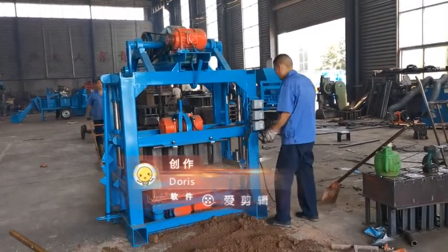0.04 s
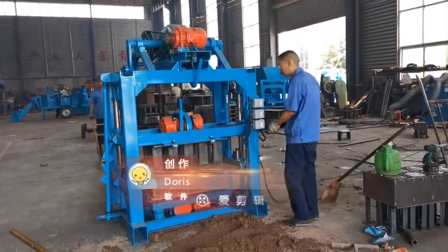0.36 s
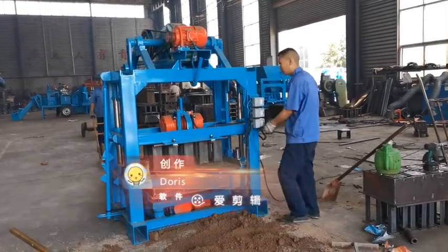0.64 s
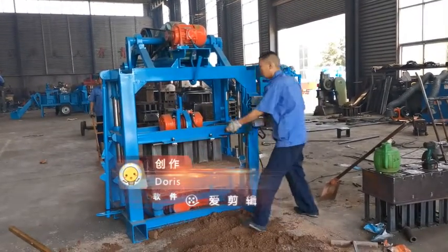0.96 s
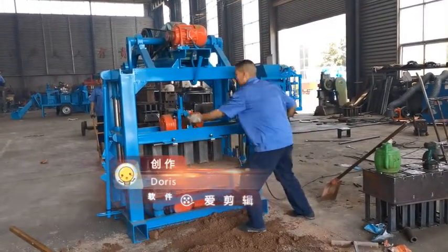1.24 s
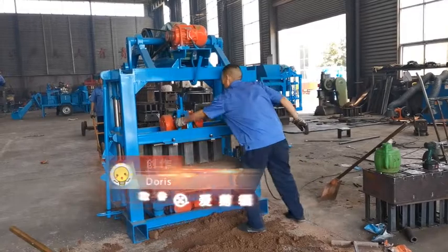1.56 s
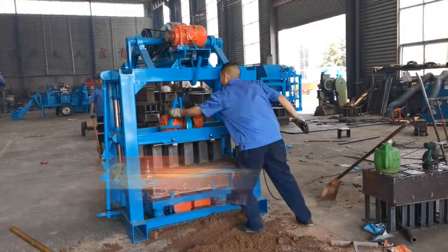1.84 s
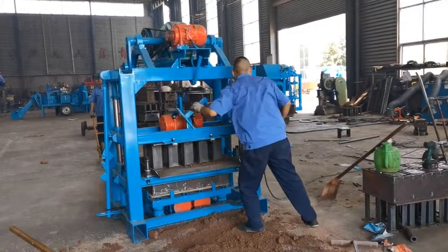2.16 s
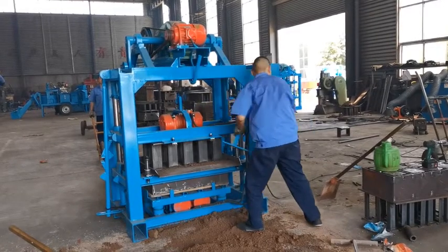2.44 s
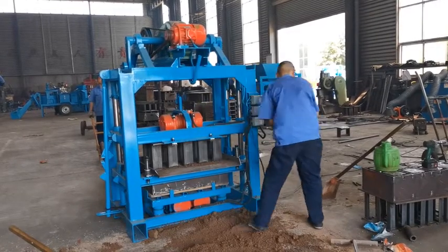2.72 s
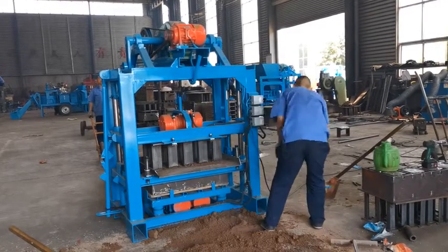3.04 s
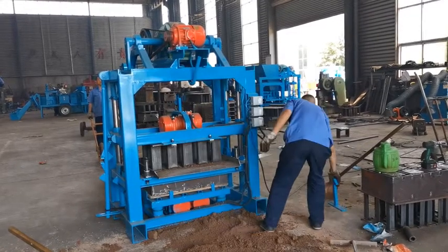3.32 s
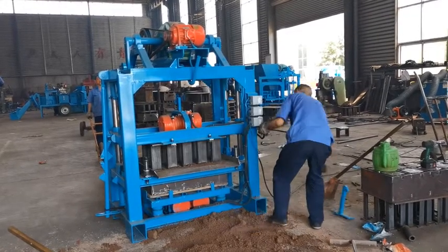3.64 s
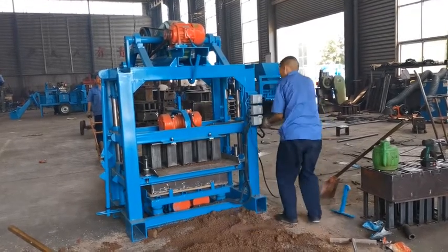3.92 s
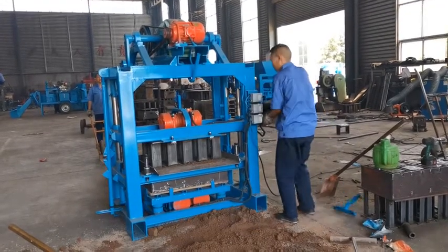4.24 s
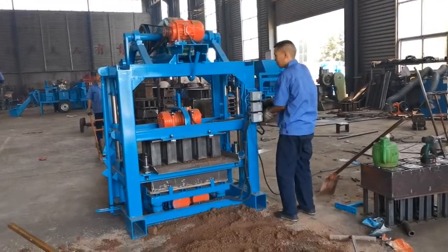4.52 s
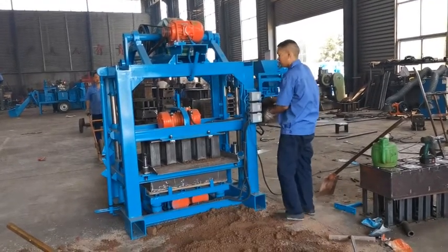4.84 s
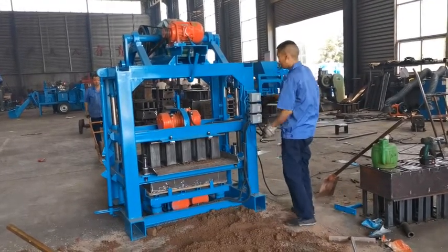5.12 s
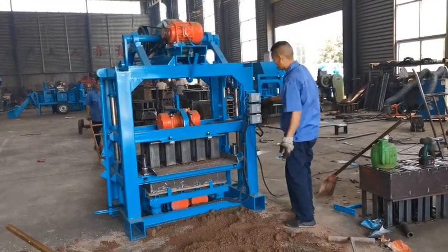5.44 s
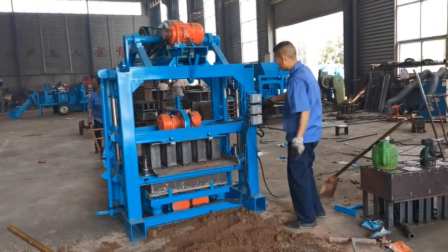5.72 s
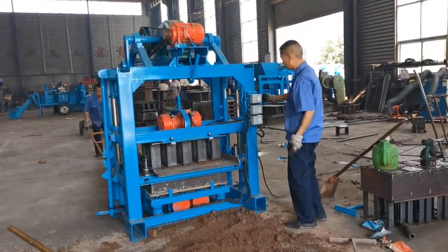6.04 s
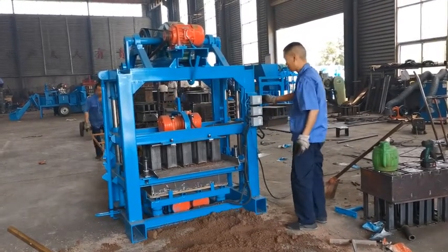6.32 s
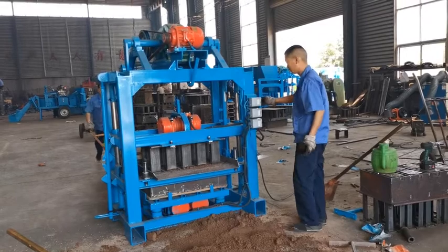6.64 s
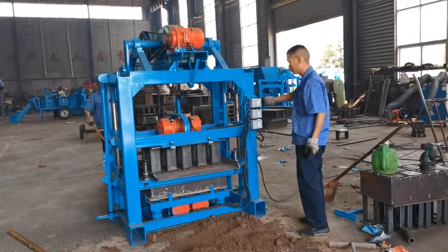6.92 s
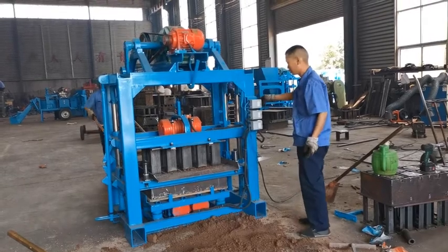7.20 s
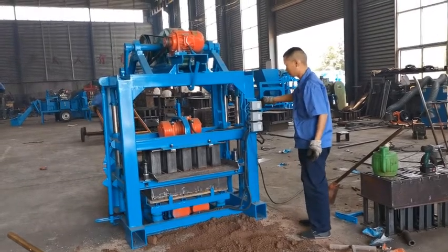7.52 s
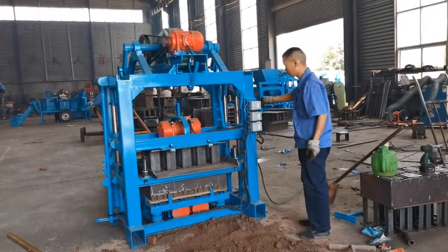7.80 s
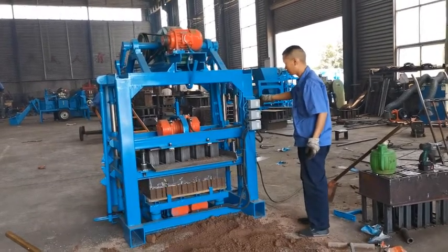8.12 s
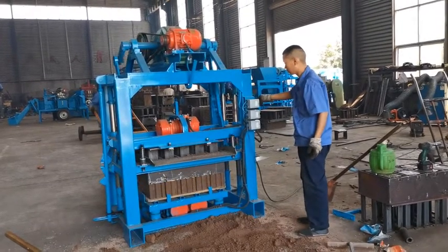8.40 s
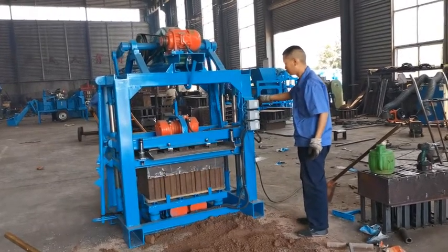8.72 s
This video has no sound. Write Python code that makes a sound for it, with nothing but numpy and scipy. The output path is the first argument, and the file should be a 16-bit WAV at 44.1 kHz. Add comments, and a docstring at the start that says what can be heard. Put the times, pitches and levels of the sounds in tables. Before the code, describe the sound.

A concrete block machine vibrates loudly in an echoing workshop, its motors droning in slow pulses while loose steel buzzes, rattles and clangs. About halfway through, the motors switch off and coast down with dull bumps and fading clatter. A much quieter rumble and hum follow as the mould lifts, with scattered metallic knocks, a click and a brief high squeal of sliding steel over a faint steady hiss.

```python
"""Concrete block machine in a steel shed

Two unbalanced motors force a mould into vibration. They drift in and out of step, so their harmonics
beat, while loose steel is struck once a turn. Switched off, they coast down and the mould bumps on its
table. Then it is hoisted: a low rumble and hum, knocks that ring the frame, and the stick-slip squeal
of sliding steel. The shed adds reverberation and a steady hiss."""
import sys
import numpy as np
from scipy import signal
from scipy.fft import rfft, irfft, next_fast_len
from scipy.io import wavfile
from scipy.ndimage import uniform_filter1d, minimum_filter1d, map_coordinates

SR = 44100
rng = np.random.default_rng(int(sys.argv[2]) if len(sys.argv) > 2 else 0)


def digitize_waveform(pressure):
    """Quantize a signal to 16-bit integers and store it at the path in sys.argv[1].

    Rows of a 2-D input are taken as channels; values are limited to [-1, 1].
    """
    field = np.atleast_2d(pressure).T
    bounded = np.clip(field, -1, 1)
    quanta = np.round(bounded * 32767).astype(np.int16)
    wavfile.write(sys.argv[1], SR, quanta)


N = 390726
TIME = np.arange(N) / SR
SWITCH_OFF_S, LAST_BEAT_END_S = 4.3, 4.5


def amp(db):
    """Decibels to amplitude ratio."""
    return 10 ** (np.asarray(db) / 20)


def unit(x):
    """Normalisation to rms 1."""
    return x / np.sqrt(np.mean(x ** 2) + 1e-20)


def along(points, hz):
    """Interpolation on a logarithmic frequency axis."""
    f, values = np.transpose(points)
    return np.interp(np.log(hz + 1), np.log(f + 1), values)


def curves(rows):
    """Linear interpolation in time of each column after the first."""
    s, *columns = np.transpose(rows)
    return [np.interp(TIME, s, column) for column in columns]


def bell(x, width):
    """Gaussian pulse: 1 at x = 0, 1/e at x = width."""
    return np.exp(-(x / width) ** 2)


def fade(after, db_per_s):
    """Unit gain, then exponential decay."""
    return amp(-db_per_s * np.maximum(TIME - after, 0))


def swell(peak_s, rise_s, db_per_s):
    """Gaussian rise to 1, then exponential decay."""
    return bell(np.minimum(TIME - peak_s, 0), rise_s) * fade(peak_s, db_per_s)


def struck(s, db, t60, attack):
    """Impact envelope: fast rise, exponential decay."""
    t = np.maximum(TIME - s, 0)
    return amp(db - 60 * np.minimum(t / t60, 3)) * (1 - np.exp(-t / attack))


def wobble(rate):
    """Smooth random modulation, rate knots a second."""
    knots = rng.standard_normal(int(N * rate / SR) + 4)
    return np.interp(TIME, TIME[::32], map_coordinates(knots, [TIME[::32] * rate]))


def noise():
    """Two uncorrelated white noises."""
    return rng.standard_normal((2, N))


def filtered(x, response):
    """Linear filtering by a complex frequency response."""
    size = next_fast_len(N + SR // 4, True)
    return irfft(rfft(x, size) * response(np.fft.rfftfreq(size, 1 / SR)), size)[..., :N]


def resonances(modes):
    """Modal superposition: the response of damped resonators of alternating sign."""
    return lambda f: sum((-1) ** k * amp(db) * 1j * f * width / (hz * hz - f * f + 1j * f * width)
                         for k, (hz, width, db) in enumerate(modes))


# likeness of left and right (frequency [Hz], coherence [0-1])
COHERENCE = [(200, 0.95), (400, 0.91), (700, 0.8), (1200, 0.96), (2500, 0.33), (6000, 0.22)]
def spread(pair):
    """Partial coherence: mid-side mixing makes two signals alike in the bass."""
    def weights(hz):
        angle = np.arccos(np.clip(along(COHERENCE, hz), -1, 1)) / 2
        return np.array([np.cos(angle), np.sin(angle)])
    mid, side = filtered(pair, weights)
    return np.array([mid + side, mid - side])


def coloured(pair, spectrum):
    """Spectral shaping by (frequency [Hz], level [dB]) points, to stereo of rms 1."""
    return unit(spread(filtered(pair, lambda hz: amp(along(spectrum, hz)))))


# the shed's reverberation time (frequency [Hz], T60 [s])
SHED_T60 = [(100, 0.58), (500, 1.2), (1200, 1.34), (4000, 1.92), (12000, 0.019)]
def shed(x, wet_db):
    """Reverberation: direct sound plus a diffuse tail, each frequency decaying at its own rate."""
    hz, t, spectra = signal.stft(rng.standard_normal((2, SR)), SR, nperseg=256)
    tail = signal.istft(spectra * amp(-60 * t / along(SHED_T60, hz)[:, None]), SR, nperseg=256)[1]
    echo = signal.fftconvolve(np.atleast_2d(x), tail / np.linalg.norm(tail[0]), axes=1)[:, :N]
    return x + amp(wet_db) * echo


# beats of the two motors (start [s], thump [dB], buzz [dB], rattle [dB], head drone [dB],
# second harmonic [dB], synchrony in mid-beat [0-1])
BEAT_CYCLES = [(0, -10, 3, -4, -11, -4.5, 0.7), (0.772, 0.5, -0.5, 1.5, 2, .5, 0.8),
               (1.572, -3, 3.5, 2.5, 1, -3, 0.98), (2.367, 1, -0.5, 2.5, 2, -.5, 0.44),
               (3.05, -1.5, -2, 2.5, -16, 1.5, 0.87), (3.902, 4.5, -5, 3, 2, -1, 0.3)]
def beat_edges():
    """Beating: each cycle starts when the motors pull hardest against each other."""
    return np.array([row[0] for row in BEAT_CYCLES] + [LAST_BEAT_END_S])


def each_beat(place, width):
    """Cyclic modulation: a pulse at the same phase (0-1) of every beat."""
    edges = beat_edges()
    phase = np.interp(TIME, edges, np.arange(len(edges)))
    return bell((phase - place + .5) % 1 - .5, width)


def beat_strengths():
    """Each beat's levels and synchrony, interpolated between beat centres."""
    edges = beat_edges()
    centres = (edges[:-1] + edges[1:]) / 2
    return [np.interp(TIME, centres, column) for column in np.transpose(BEAT_CYCLES)[1:]]


# both motors coasting (time [s], speed [turns/s])
COAST_SPEED = [(4.5, 43), (4.9, 28.6), (5.4, 22), (6.4, 11.2)]
def shaft(speed):
    """Shaft angle in turns is the integral of speed, driven and then coasting."""
    coasting, = curves([(SWITCH_OFF_S, np.interp(SWITCH_OFF_S, TIME, speed))] + list(COAST_SPEED))
    return np.cumsum(np.where(TIME < SWITCH_OFF_S, speed, coasting)) / SR - .27


# the table motor's drift about its mean pace (time [s], lead [turns])
TABLE_DRIFT = [(0, -.1), (.2, -.03), (.65, -.11), (1.05, .02), (1.5, -.08), (1.83, .11), (2.2, 0),
               (2.45, -.01), (2.92, -.16), (3.3, .02), (3.7, -.03), (4, 0), (4.3, -.22)]
def motors():
    """Coupled rotors: once a beat the head motor races ahead, then drags the table motor down."""
    table_hz, sag_hz, head_hz, race_hz = 48.35, 1.8, 48.6, 2.4
    table = shaft(table_hz - sag_hz * each_beat(place=0, width=.21)) + curves(TABLE_DRIFT)[0]
    head = shaft(head_hz + race_hz * each_beat(place=.747, width=.4))
    return table, head


def harmonic(turns, order, jitter):
    """A shaft harmonic of rms 1; dispersion in the frame delays its phase, smearing each thud."""
    lag_cycles = .045 * (order - 5) ** 2
    return np.sqrt(2) * np.cos(2 * np.pi * (order * turns - lag_cycles) + jitter * wobble(30))


# table harmonics (order [1], level [dB], dip [dB], dip phase [beats], dip width [beats])
TABLE_HARMONICS = [(1, -40, 14, 0.06, 0.16), (2, -26, 21, .96, 0.18), (3, -26, 8, 0.88, 0.16),
                   (4, -26, 7, 0.83, 0.25), (5, -20, 9.5, 0.95, 0.082), (6, -17.5, 13.5, 0.69, 0.13),
                   (7, -20.5, 7.5, .66, 0.17), (8, -26.5, 17.5, 0.06, 0.22), (9, -30, 1, 0, 0.24),
                   (10, -25.5, 8, 0.47, 0.072), (12, -40.5, 8, 0, 0.23), (13, -48, 6, 0, .2),
                   (14, -42, -7.5, 0.05, 0.33)]
def table_drone(table):
    """Forced vibration: a rotating unbalance swings the frame; in step, the eighth harmonic sings."""
    *_, hum_db, in_step = beat_strengths()
    boost_db = {2: hum_db, 8: 15.5 * in_step}
    out = np.zeros(N)
    for order, db, dip_db, place, width in TABLE_HARMONICS:
        level_db = db + boost_db.get(order, 0) - dip_db * each_beat(place, width) + .68 * wobble(6.19)
        out += amp(level_db) * harmonic(table, order, jitter=.039)
    return out


# panel howls (peak time [s], half length [s], level [dB], order [1])
PANEL_HOWLS = [(0.035, 0.078, -19, 15), (0.08, 0.052, -20.5, 7), (0.1, 0.055, -27, 19),
               (.3, 0.19, -30.5, 13), (0.448, 0.096, -27.5, 19), (0.618, 0.08, -16.5, 10),
               (0.87, 0.052, -31, 14), (0.932, 0.049, -13, 10), (1.486, 0.1, -27.5, 10),
               (1.62, .16, -31, 14), (1.71, 0.041, -15.5, 10), (1.92, 0.12, -34, 17),
               (2.572, 0.054, -18, 10), (3.204, 0.035, -16.5, 10), (3.704, 0.085, -21.5, 10),
               (4.243, 0.11, -19, 10)]
def howls(table):
    """Resonance: a harmonic swells briefly as it sweeps through a panel mode."""
    return sum(amp(db) * bell(TIME - s, length) * harmonic(table, order, jitter=.054)
               for s, length, db, order in PANEL_HOWLS)


# head vibrator harmonics (order [1], level [dB])
HEAD_HARMONICS = [(3, -19.5), (5, -11), (6, -8), (7, -0.5), (8, -4.5), (9, -5.5), (10, -18.5)]
def head_drone(head):
    """Synchronisation: the head's drone swells as it races and sinks as the motors fall into step."""
    *_, head_db, _, in_step = beat_strengths()
    locked = in_step * each_beat(place=.43, width=.11)
    gain = amp(-25 + head_db + 8.6 * each_beat(place=.81, width=.12) - 13 * locked)
    return gain * sum(amp(db) * harmonic(head, order, jitter=.065) for order, db in HEAD_HARMONICS)


def blows(turns, scatter_s, size_db):
    """Impulse train: one blow a turn, scattered in time and size."""
    at = np.flatnonzero(np.diff(np.floor(turns)))
    chance = rng.standard_normal((len(at), 2))
    at = np.clip(at + chance[:, 0] * scatter_s * SR, 0, N - 1).astype(int)
    return np.bincount(at, amp(size_db * chance[:, 1]), N)


def chatter(hits, decay_s, grain_db):
    """Contact noise: each blow sets off a burst of tiny collisions that builds and dies."""
    pole = np.exp(-2 / (decay_s * SR))
    power = signal.lfilter([1], np.poly([pole, pole]), hits ** 2)
    return np.sqrt(np.abs(power)) * amp(grain_db * wobble(900)) * noise()


# the mould's response (frequency [Hz], level [dB])
MOULD_SPECTRUM = [(25, -52), (60, -46), (110, -15.5), (150, -11.5), (200, -5), (260, -1.5), (310, 1.5),
                  (370, 4), (450, -6.5), (530, -12.5), (900, -53), (3000, -120)]
def mould_thump(table, head):
    """Impact excitation: both motors bounce the heavy mould on the table."""
    bounces = blows(table, scatter_s=.00068, size_db=2.5)
    bounces += .42 * blows(head, scatter_s=.003, size_db=3.5)
    return coloured(shed(chatter(bounces, decay_s=.0051, grain_db=-1), wet_db=-3.5), MOULD_SPECTRUM)


# the panels' response (frequency [Hz], level [dB])
PANEL_SPECTRUM = [(150, -90), (400, -4), (560, -4.5), (680, 3.5), (880, -3), (1100, -8.5), (1800, -23),
                  (5000, -120)]
def panel_buzz(table):
    """Periodic excitation: slaps once a turn fuse into a buzz."""
    slaps = blows(table, scatter_s=.00012, size_db=2)
    force = unit(slaps) + .78 * unit(chatter(slaps, decay_s=.0056, grain_db=-.5))
    return coloured(shed(force, wet_db=2.5), PANEL_SPECTRUM)


# loose steel and grit (frequency [Hz], level [dB])
STEEL_SPECTRUM = [(440, -36), (750, -35), (852, 2), (1010, -12.5), (1290, -3.5), (1470, -9), (1900, -3),
                  (2260, -6.5), (2470, -4), (3340, -17.5), (4200, -22.5), (4510, -35), (5000, -28),
                  (6500, -34), (11000, -120)]
GRIT_SPECTRUM = [(2650, -30), (4500, -11.5), (4920, -9), (7610, -8), (8460, -13), (10400, -8.5),
                 (11200, -13.5), (12700, -28), (14900, -29)]
def rattle_and_grit(strokes):
    """Rattling contact: loose parts are hammered once a turn, then tumble as the shafts slow."""
    hammering = unit(chatter(strokes, decay_s=.003, grain_db=.5))
    driven = fade(after=4.27, db_per_s=29)
    tumbling = unit(amp(1.5 * wobble(76) + 1.9 * wobble(700)) * noise())
    contacts = shed(driven * hammering + np.sqrt(1 - driven ** 2) * tumbling, wet_db=-4.5)
    return coloured(contacts, STEEL_SPECTRUM), coloured(contacts + 1.62 * noise(), GRIT_SPECTRUM)


# loose plate modes (frequency [Hz], bandwidth [Hz], level [dB])
PLATE_MODES = [(1070, 57, -7), (1604, 72, -8.5), (1866, 59, -2), (2104, 110, -5), (2410, 65, -1),
               (2580, 110, -2), (2747, 75, -1.5)]
# strength of their ringing (time [s], relative level [dB])
PLATE_ENVELOPE = [(0.0, -41), (0.05, -20), (0.2, -46), (0.71, -29.5), (1.05, -27.5), (1.3, -32.5),
                  (1.44, -24.5), (1.56, -31), (1.95, -33), (2.03, -57), (2.19, -29), (2.46, -28),
                  (2.6, -43), (2.84, -42), (2.93, -29), (3.66, -44), (3.86, -23), (4.08, -42), (4.23, -33),
                  (4.4, -44)]
def plates(strokes):
    """Modal ringing: each stroke gives loose plates one clean tap and a short chatter."""
    level_db = curves(PLATE_ENVELOPE)[0] + 1
    taps = unit(strokes) + .6 * unit(chatter(strokes, decay_s=.0018, grain_db=.3))
    ring = unit(spread(shed(filtered(taps, resonances(PLATE_MODES)), wet_db=-15.5)))
    return amp(level_db) * ring * fade(SWITCH_OFF_S, db_per_s=62)


def coasting_loss(step_db, db_per_s=0):
    """Attenuation in dB after switch-off: a quick step, then any steady fall."""
    since = np.maximum(TIME - SWITCH_OFF_S, 0)
    return step_db * np.minimum(since / .079, 1) + db_per_s * since


# harder shaking (peak time [s], half length [s], thump [dB], buzz [dB], rattle [dB], grit [dB])
SHAKE_JOLTS = [(0.05, 0.052, 11, 6, 12.5, 2.2), (0.63, 0.085, -4, 5, 5.8, 3), (0.86, 0.057, 2, 3, 2.7, 4.4),
               (1.428, 0.044, 3.5, 2.5, 5, 1.7), (1.642, 0.069, 1.5, 2, 1, 3.3),
               (2.455, 0.074, 1, 0, 2.8, 3.8), (2.957, 0.038, -2, -0.5, 0.5, 1.5),
               (3.82, 0.12, -1, 8, 1.5, 2.3), (4.26, 0.13, -4.5, 2.5, 2.5, 4.5),
               (5.106, 0.14, 3, 17, 7.2, 8.9)]
def shaking(table, head):
    """Amplitude modulation: the shaken parts ease in mid-beat, flare in jolts and sink on coasting."""
    thump_db, buzz_db, rattle_db, *_, in_step = beat_strengths()
    settled = in_step * each_beat(place=.54, width=.14)  # in step, the mould settles on the table
    thump_db += -16.8 - 8 * settled - coasting_loss(2, db_per_s=15)
    buzz_db += -29 + 6 * each_beat(place=.11, width=.081) - coasting_loss(-4, db_per_s=24)
    rattle_db += -25.2 - 3 * each_beat(place=.32, width=.6) - coasting_loss(6.5)
    grit_db = -38.5 - 6 * each_beat(place=.38, width=.34) - coasting_loss(7.5)
    jolts_db = sum(np.outer(boost_db, bell(TIME - s, length)) for s, length, *boost_db in SHAKE_JOLTS)
    gains = amp(np.array([thump_db, buzz_db, rattle_db, grit_db]) + jolts_db)
    thump, buzz = mould_thump(table, head), panel_buzz(table)
    strokes = blows(table, scatter_s=.0002, size_db=1.1)
    rattle, grit = rattle_and_grit(strokes)
    shaken = sum(gain * part for gain, part in zip(gains, (thump, buzz, rattle, grit)))
    return (shaken + plates(strokes)) * fade(after=5.07, db_per_s=70)


# the shed's background (frequency [Hz], level [dB])
HISS_SPECTRUM = [(350, -4.5), (600, -5), (1030, -10.5), (1830, -11.5), (2040, -11.5), (2400, -9),
                 (3940, -20), (5820, -23.5), (6390, -29.5), (10400, -32), (14900, -52)]
def hiss():
    """Ambient noise: broadband and nearly steady."""
    return amp(-44.5 + .44 * wobble(18)) * coloured(noise(), HISS_SPECTRUM)


def rung(hits, modes, attack):
    """Free vibration: each hit starts the same damped modes at new strengths and phases."""
    out, t = np.zeros(N + SR), np.arange(SR // 4) / SR
    hz, mode_db, t60 = np.transpose(modes)[:, :, None]
    for s, db in hits:
        strength, phase = rng.standard_normal((2, len(hz), 1))
        partials = amp(mode_db + 2 * strength - 60 * t / t60) * np.sin(2 * np.pi * hz * t + phase)
        ring = partials.sum(axis=0) * (1 - np.exp(-t / attack))
        out[round(s * SR):][:len(t)] += amp(db) * ring / np.abs(ring).max()
    return out[:N]


# blows on a panel (time [s], level [dB])
PANEL_HITS = [(.022, -7), (.072, -23), (.116, -14), (.831, -11), (.873, -12), (.91, -10), (1.604, -18),
              (1.688, -13), (3.158, -25)]
# its modes (frequency [Hz], level [dB], T60 [s])
PANEL_MODES = [(677, 0, 0.17), (699, -2, 0.19), (725, -2, 0.13), (818, 4, 0.16), (872, -1, .12),
               (915, -6, 0.13), (1096, -4, 0.053), (1290, -4, 0.045)]
def clangs():
    """Inharmonic modes: a struck panel clangs while the machine runs."""
    return shed(rung(PANEL_HITS, PANEL_MODES, attack=.001), wet_db=-13)


# the mould landing on the table (time [s], level [dB])
MOULD_HITS = [(4.334, -7), (4.41, -15), (4.489, -4.5), (4.524, -6), (4.546, -8), (4.578, -4), (4.607, -10),
              (4.653, -7), (4.692, -10), (4.738, -10.5), (4.803, -12.5), (4.868, -12), (4.908, -22),
              (5.012, -20), (5.046, -15.5), (5.085, -14.5)]
# its modes (frequency [Hz], level [dB], T60 [s])
MOULD_MODES = [(146.5, -12, 0.14), (235, -14, 0.076), (300, -2, 0.047), (321, 2.5, 0.075),
               (352, -3.5, 0.059), (390, -12, 0.041), (465, -22, .04)]
def bumps():
    """Heavy damping: the mould's low modes die quickly at each bump while the motors coast."""
    return shed(rung(MOULD_HITS, MOULD_MODES, attack=.0055), wet_db=-23)


# steel sliding on steel (time [s], rise [s], frequency [Hz], level [dB], hold [s], T60 [s])
STEEL_SQUEALS = [(4.425, .01, 4272, -33, .05, 1.1), (4.43, .02, 4152, -38, .1, 1),
                 (4.38, .06, 7942, -45, .08, .5), (7.455, .02, 3892, -41, .01, .1),
                 (7.47, .02, 3955, -49, .01, .5), (8.036, .04, 3961, -24, .115, .68),
                 (8.01, .058, 9265, -25.5, .01, .22), (8.125, .04, 9265, -39, 0, .5),
                 (8.06, .055, 7915, -38.5, .03, .48), (8.07, .04, 7776, -47, .03, .3),
                 (8.025, .045, 13250, -44.5, .01, .27), (8.06, .055, 11900, -53, .01, .3)]
def squeals():
    """Stick-slip friction pumps up a mode and a weaker twin just above it, which beat and ring out."""
    twin_gap_hz, twin_share = 16, .45
    out = np.zeros(N)
    for s, rise, hz, db, hold, t60 in STEEL_SQUEALS:
        part = slice(round(s * SR), round(s * SR) + SR)
        t = TIME[part] - TIME[part][0]
        decay_db = 60 * np.maximum(t - rise - hold, 0) / t60
        gain = np.minimum(t / rise, 1) ** 2 * amp(db - decay_db + wobble(30)[part])
        twin_phase = 2 * np.pi * twin_gap_hz * (t - rise) + .55 * wobble(25)[part]
        pair = (1 + twin_share * np.exp(1j * twin_phase)) / (1 + twin_share)
        phase = 2 * np.pi * hz * t + .55 * wobble(70)[part] + .19 * wobble(400)[part]
        out[part] += gain * np.imag(pair * np.exp(1j * phase))
    return out


# clattering steelwork (frequency [Hz], level [dB])
STEELWORK_SPECTRUM = [(410, -24), (700, -9.5), (761, -5.5), (931, -1.5), (1730, -9.5), (2620, -6.5),
                      (4470, -21.5), (5810, -23.5), (8010, -40), (10400, -32), (12000, -58), (15600, -80),
                      (22000, -120)]
def run_down(table):
    """Passage through resonance: frame and mould sway as the shafts slow; a faint clatter lingers."""
    frame = coloured(noise(), [(90, -18), (132, -1), (146, 2), (160, 4), (220, -60), (600, -120)])
    mould = coloured(noise(), [(150, -120), (285, -10), (320, -5), (355, -4), (560, -120)])
    sway_gain = swell(4.5, rise_s=.044, db_per_s=34.5) * fade(5.05, db_per_s=47)
    sway = sway_gain * (amp(-22.5) * frame + amp(-21.5) * mould)
    loose = chatter(blows(table, scatter_s=.009, size_db=2), decay_s=.005, grain_db=1)
    flicker = amp(.5 * wobble(22) + 1.6 * wobble(150))
    clatter = .92 * flicker * noise() + .55 * unit(shed(unit(loose), wet_db=5))
    clatter_gain = amp(-28.5) * fade(5.174, db_per_s=15) + amp(-49) * swell(5.1, rise_s=.12, db_per_s=30)
    return sway + clatter_gain * coloured(clatter, STEELWORK_SPECTRUM)


# heaves of the hoist (peak time [s], half length [s], rumble boost [dB], hum boost [dB])
HOIST_HEAVES = [(5.384, 0.052, 5.5, 9), (5.98, 0.043, 3, 2), (6.216, 0.14, 4.5, 0), (6.617, 0.071, 1, 8),
                (7.09, 0.1, 2, 7), (7.28, 0.075, 0, 11), (7.512, 0.07, 2.5, 10), (7.99, 0.04, 4.5, 7),
                (8.28, 0.08, 5, 16.5), (8.44, 0.093, 9.5, 10), (8.67, 0.11, 4.5, 11)]
# the juddering frame (frequency [Hz], level [dB])
RUMBLE_SPECTRUM = [(20, -40), (40, -11), (62, -8), (100, -9.5), (160, -9), (300, -9), (450, -16.5),
                   (620, -30.5), (1300, -37), (3000, -120)]
def hoist():
    """Vibration under load: a constant motor hum and frame rumble swell at every heave."""
    hum_hz = 98
    heave_db = sum(np.outer(boost_db, bell(TIME - s, length)) for s, length, *boost_db in HOIST_HEAVES)
    dip_db = 8.1 * bell(TIME - 8.12, width=.069)  # rumble and hum dip briefly just before they swell
    rumble_db, hum_db = heave_db - dip_db
    rumble = amp(-38.5 + rumble_db + 1.7 * wobble(18)) * coloured(noise(), RUMBLE_SPECTRUM)
    hum = amp(-45.5 + hum_db + 2.5 * wobble(18)) * harmonic(hum_hz * TIME, order=1, jitter=.57)
    return rumble + hum


# knocks on the frame (time [s], level [dB], low group [dB], middle group [dB], high group [dB])
FRAME_HITS = [(6.119, -27.5, -11, -16, -9), (6.389, -30, -11, -7, -5), (6.453, -23, -14, -3.5, -15),
              (6.526, -27, -20, -5, -9), (7.123, -26.5, -3, -15, -24), (7.149, -22, -5.5, -10.5, -30),
              (7.193, -26, -2, -18, -34), (7.434, -21.5, -5.5, -13, -10), (8.189, -34, -7, -22, -11),
              (8.751, -23, 1, -28, -16), (8.777, -20.5, 2, -34, -33), (8.833, -21.5, -1, -27, -22)]
# its modes in low, middle and high groups (frequency [Hz], bandwidth [Hz], level [dB])
FRAME_MODES = [
    [(716, 90, -1.5), (852, 27, 4.5), (940, 60, -1.5)],
    [(1104, 72, -9), (1170, 63, -18), (1280, 150, -11)],
    [(1980, 250, 2), (2600, 260, 6)],
]
def knocks():
    """Transient excitation: each knock is a short scrape that rings three groups of frame modes."""
    out = np.zeros((2, N))
    for group, (modes, gain_db, t60) in enumerate(zip(FRAME_MODES, (-5, -2, -2), (.18, .17, .16))):
        envelope = sum(struck(s - .003, db + ring_db[group] + gain_db, t60, attack=.004)
                       for s, db, *ring_db in FRAME_HITS)
        response = lambda hz: resonances(modes)(hz) / (1 + (hz / 3500) ** 4)  # heavy parts: no treble
        out += envelope * unit(filtered(noise(), response))
    return spread(out)


# guide modes (frequency [Hz], bandwidth [Hz], level [dB])
GUIDE_MODES = [(1290, 95, -2), (2580, 130, 7)]
def scrape():
    """Sliding friction: steel drags along a guide and keeps it ringing between knocks."""
    envelope = amp(-44 + 1.8 * wobble(60)) * bell(TIME - 6.47, width=.1)
    return spread(envelope * unit(filtered(noise(), resonances(GUIDE_MODES))))


def click():
    """A brief contact has a broad spectrum: a sharp click, like a switch closing."""
    envelope = struck(s=7.118, db=-43, t60=.09, attack=.0011)
    return envelope * coloured(noise(), [(2500, -34), (7000, -1), (14000, -7)])


def scene():
    """Superposition: the motors drive drone and shaking; the hoist takes over when they stop."""
    table, head = motors()
    drone = (table_drone(table) + howls(table) + head_drone(head)) * fade(SWITCH_OFF_S, db_per_s=91)
    running = drone + shaking(table, head) + clangs()
    stopping = bumps() + run_down(table)
    lifting = hoist() + shed(knocks() + click(), wet_db=-13) + scrape() + squeals()
    return running + stopping + lifting + hiss()


# the right microphone port is dull (frequency [Hz], left minus right [dB])
PORT_BALANCE = [(60, -0.5), (91, 1), (140, 0), (210, 0), (320, -0.5), (490, -1), (750, -0.5), (1150, 0.5),
                (1750, -0.5), (2670, -7), (4080, 4), (6220, 4.5), (9480, 35.5), (14400, 18)]
# sound reaches the left port first (frequency [Hz], phase lead [rad])
PORT_LEAD = [(0, 0), (300, 0.14), (1000, 0.92), (2000, 1.5), (3200, 3.5), (5000, 7)]
def ports(hz):
    """Level and phase differences between two microphone ports, at constant total power."""
    gains = amp(np.outer([.5, -.5], along(PORT_BALANCE, hz)))
    delay = np.exp(1j * np.outer([.5, -.5], np.interp(hz, *np.transpose(PORT_LEAD))))
    return delay * gains / np.sqrt(np.mean(gains ** 2, axis=0))


# at first the sound leans left (time [s], left minus right [dB])
OPENING_BALANCE = [(.47, 4.5), (.54, 0)]
def record(dry):
    """Stereo pickup, peak limiting and band limiting."""
    ceiling, window_samples, low_hz, top_hz = .96, 221, 28, 15050
    x = filtered(dry, ports) * amp(np.outer([.5, -.5], curves(OPENING_BALANCE)[0]))
    limiter_gain = ceiling / np.maximum(np.abs(x).max(axis=0), ceiling)
    x = x * uniform_filter1d(minimum_filter1d(limiter_gain, window_samples), window_samples)
    return filtered(x, lambda hz: (hz < top_hz) * hz ** 4 / (hz ** 4 + low_hz ** 4))


dry = scene()
out = record(dry)
digitize_waveform(out)
```